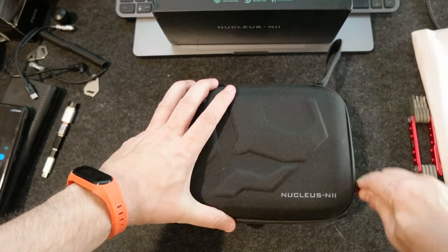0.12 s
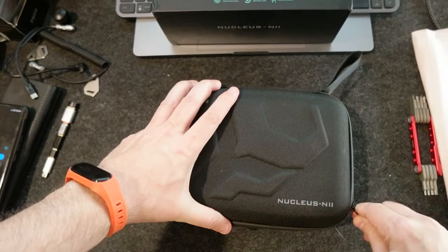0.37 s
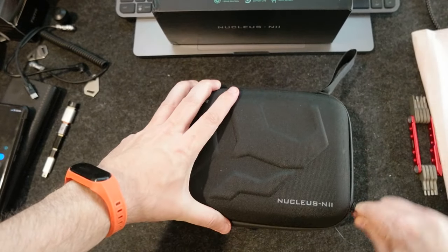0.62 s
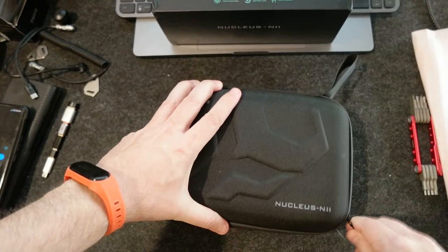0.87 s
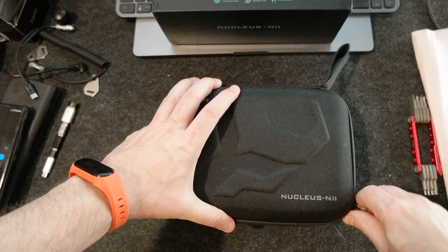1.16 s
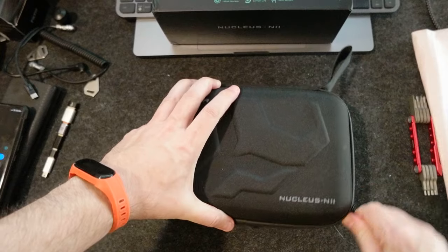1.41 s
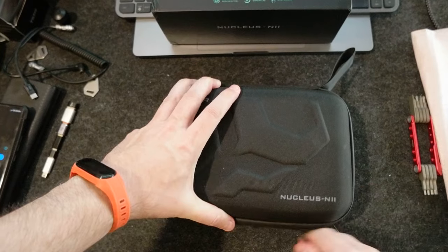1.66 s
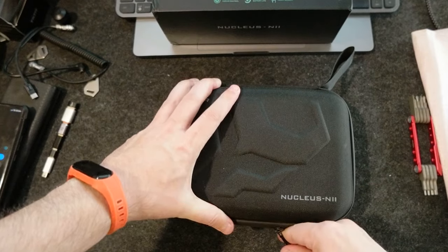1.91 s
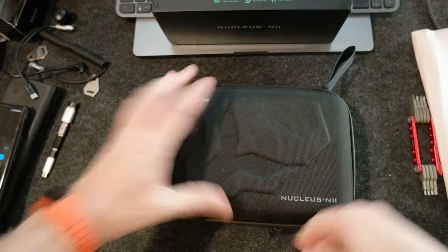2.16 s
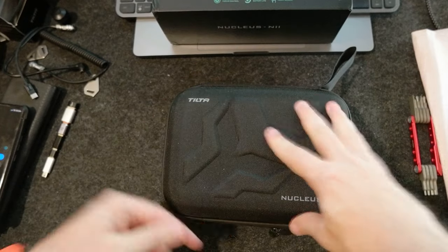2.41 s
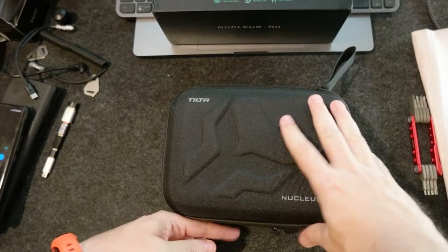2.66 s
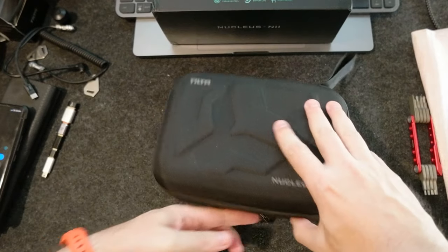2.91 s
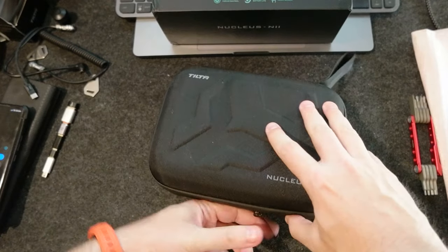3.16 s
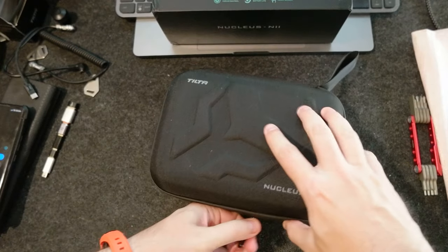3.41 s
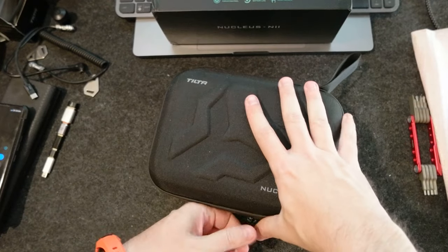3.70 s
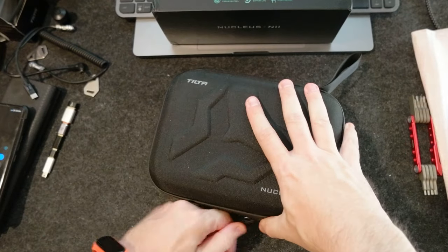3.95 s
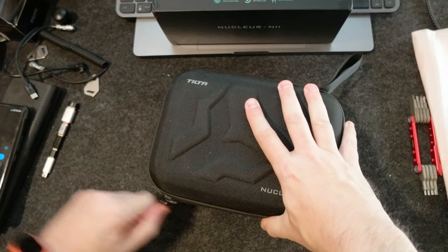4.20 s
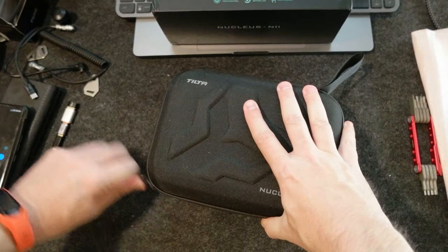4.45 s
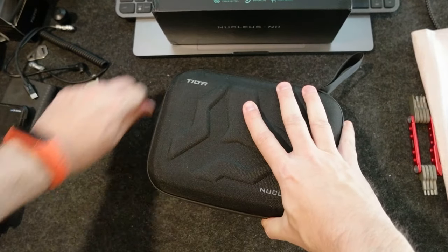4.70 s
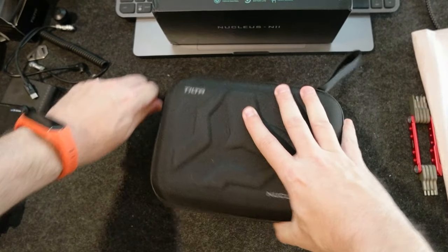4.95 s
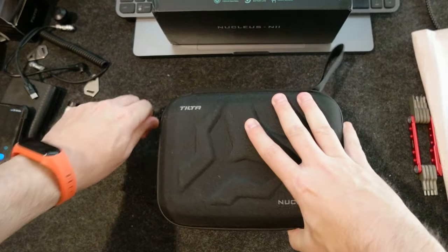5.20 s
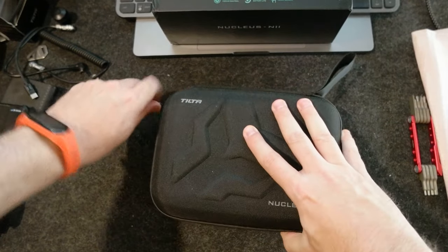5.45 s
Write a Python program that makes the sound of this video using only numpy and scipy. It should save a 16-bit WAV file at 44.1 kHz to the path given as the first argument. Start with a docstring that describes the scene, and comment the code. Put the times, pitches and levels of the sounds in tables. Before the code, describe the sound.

A zipper on a hollow, hard fabric case is heard very close in stereo in a small room with faint air noise and a short tail. From 0 to 1.3 s the slider snags: dry clicks, dull shell knocks and brief scratchy scrapes at about 0.15, 0.3, 0.6, 0.9 and 1.2. At 1.42 a hard click starts a bright, buzzing zip of under 0.2 s; a weaker one follows to 1.8, ending in rapid ticks. Knocks near 1.9 to 2.15 give way to quiet hand rubbing. A faint, higher zip comes at 2.85, then a sharp jerk at 3.12 with a tiny ringing tab. Soft rubs and small taps lead to two stronger rasping pulls, 3.95 to 4.3 and 4.34 to 4.8, the second longer and rougher, with thin metallic clinks near 4.2 and slowing ticks near 4.75. Soft brushing and taps finish, with a clear knock at 5.35.

```python
"""Zipper on a hard fabric case

A zipper is pulled round in short strokes on a felt desk top in a small room, before a close stereo pair.
Teeth buzz as a sine at their passing rate; random slips drive resonant shell and panels, and filtered hiss.
Knocks are noise cracks with struck modes, metal tab and slider are ringing modes; a noise tail is the room.
"""
import sys
import numpy as np
from scipy import signal
from scipy.fft import rfft, irfft
from scipy.io import wavfile
from scipy.ndimage import uniform_filter1d

SR = 44100
rng = np.random.default_rng(int(sys.argv[2]) if len(sys.argv) > 2 else 0)


def makeup_ratio(level_db):
    """Linear amplitude ratio for a level in decibels (20 dB per factor of ten)."""
    decades = np.asarray(level_db, float) / 20
    return 10 ** decades


def persist_wave(psi):
    """Save psi, clipped to +-1, as 16-bit WAV."""
    counts = np.round(np.clip(psi, -1, 1) * 32767).astype(np.int16)
    wavfile.write(sys.argv[1], SR, np.atleast_2d(counts).T)


N = 246519  # length in samples

# Pulls of the slider, one list each. Each row: time in seconds, teeth per second, tooth tone in dB,
# then friction in dB in the shell, on the tape and in the cloth.
PULLS = [
    [(1.417, 281, -50, -49, -44, -55), (1.426, 280, -49.5, -32, -39, -31),
     (1.445, 272, -21, -33, -31, -26.5), (1.47, 271, -22, -17, -29.5, -28.5),
     (1.51, 301, -11, -23.5, -34.5, -36), (1.54, 276, -64, -40, -42, -43), (1.61, 276, -70, -43, -56, -64)],
    [(1.62, 185, -70, -47.5, -48, -54.5), (1.676, 213, -30, -35.5, -37, -42),
     (1.71, 222, -35, -37, -41.5, -43.5), (1.73, 255, -32, -33.5, -38.5, -38),
     (1.78, 289, -47, -36, -47, -50), (1.85, 289, -74.5, -58, -61, -69)],
    [(2.72, 280, -73, -56, -62.5, -59), (2.812, 280, -51, -47, -49, -47),
     (2.854, 285, -49, -37.5, -45, -46.5), (2.884, 355, -32, -40, -42.5, -46.5),
     (2.93, 360, -41.5, -36.5, -43, -47.5), (2.998, 348, -67, -46.5, -49, -53),
     (3.09, 348, -70, -46, -66, -74)],
    [(3.93, 197, -70, -33, -50, -54), (3.973, 197, -58, -30, -37.5, -36.5),
     (4.03, 210, -41.5, -31.5, -35.5, -38.5), (4.066, 270, -28, -25.5, -32.5, -31.5),
     (4.105, 301, -25, -40, -30.5, -30.5), (4.187, 304, -61, -20, -29, -34.5),
     (4.22, 303, -38, -31.5, -36, -43), (4.325, 303, -70, -48, -57, -57)],
    [(4.334, 224, -77.5, -64, -52, -51), (4.342, 224, -62, -32.5, -44.5, -48),
     (4.43, 220, -36, -24.5, -32.5, -34), (4.465, 240, -25.5, -18.5, -29.5, -33.5),
     (4.504, 225, -31, -25.5, -43.5, -50), (4.59, 286, -43, -31, -32, -33),
     (4.652, 331, -22, -24.5, -31.5, -32), (4.68, 309, -34, -31, -32, -29.5),
     (4.712, 280, -48, -28.5, -33.5, -33.5), (4.75, 271, -38, -28, -36, -36),
     (4.84, 271, -79, -44, -54, -57)],
]
# How strongly each pull stirs the panels as the slider moves round the case.
# Each row: rasp in dB, overtones of the teeth in dB.
PULL_PANELS = [(-1.5, -1.5), (0, -5), (3.5, 4.5), (2, 3), (2, 3.5)]
# Second and third harmonic of the teeth driving the panels, in dB relative to tape friction.
OVERTONES_DB = [-44.5, -43]
# Scrapes that a jerk starts and that die away.
# Each row: start in seconds, fade in seconds, then shell, tape and cloth friction in dB.
SCRAPES = [(0.001, 0.12, -49, -37, -47), (.337, 0.07, -36.5, -36.5, -37.5), (0.52, 0.17, -46, -56, -56),
           (0.619, 0.067, -36.5, -39, -39), (0.651, 0.16, -30.5, -37.5, -41),
           (0.883, 0.14, -40, -41.5, -59), (0.917, 0.36, -48, -43, -49.5), (1.056, 0.011, -31, -23, -27.5),
           (1.065, 0.092, -41, -39, -41.5), (1.193, 0.12, -39, -39.5, -46), (1.89, 0.18, -34.5, -50.5, -63),
           (2.16, 0.12, -42, -51, -67), (3.118, 0.14, -30, -36, -33), (3.25, 0.18, -36.5, -40.5, -44.5),
           (3.774, 0.084, -34, -47, -42), (4.855, 0.08, -29.5, -41, -55), (5.154, 0.15, -38.5, -43.5, -53),
           (5.537, 0.037, -45, -66, -80)]
# Hands sliding over the case, swelling and fading.
# Each row: middle in seconds, half length in seconds, then shell, tape and cloth friction in dB.
RUBS = [(0.182, 0.11, -44, -45, -52), (0.283, 0.13, -49, -45, -50), (0.456, 0.022, -47.5, -58, -69),
        (0.513, 0.034, -43, -55, -65), (0.846, 0.046, -60, -46, -55.5), (0.955, 0.064, -64, -37, -47.5),
        (1.324, 0.084, -53.5, -51.5, -72), (1.408, .06, -63, -47, -58), (2.074, 0.29, -54, -55, -50.5),
        (2.142, 0.062, -41.5, -47.5, -66), (2.235, 0.13, -52, -63, -64), (2.327, .1, -48, -61.5, -78),
        (2.412, 0.066, -42, -52, -48.5), (2.539, .1, -52.5, -59, -53), (2.655, 0.16, -59.5, -63, -67),
        (3.115, 0.016, -40, -54, -75), (3.167, 0.15, -42.5, -52, -71), (3.432, 0.1, -52, -48, -50.5),
        (3.621, 0.089, -54, -54.5, -51.5), (3.744, 0.069, -55, -56.5, -50),
        (3.848, 0.13, -49.5, -56.5, -58), (4.919, 0.1, -59, -40, -49), (5.008, 0.13, -37.5, -39.5, -48),
        (5.144, 0.033, -41, -48, -59), (5.325, 0.14, -49.5, -45.5, -52), (5.383, 0.077, -42.5, -49, -58)]
# Snags of the slider and finger knocks. Each row: time in seconds, nominal crack level in dB,
# then shell thump, panel knock and bright snap in dB relative to it, each before its layer's own trim.
KNOCKS = [(0.1, -37.5, -5, 8, -20), (0.136, -18.5, -2.5, -6, -23), (0.177, -15.5, -18, -18, -15.5),
          (0.2766, -22.5, 1, -21, -9), (0.2993, -14.5, -10, -12, -19.5), (0.3348, -13.5, -12.5, -14, -7),
          (0.5177, -40, -7, 25, -5.5), (0.545, -39, -8, 10, -15), (0.58, -39, -8, 6, -15),
          (0.613, -14, -24, -14, -7), (0.6477, -14.5, -34, -9, -7), (0.659, -13, -12, -8, -21),
          (0.8808, -16, -5.5, -8, -28), (0.9192, -18.5, 0.5, -3, -22), (1.054, -15.5, -4, 0, -21),
          (1.1892, -17, -30, 1, -14), (1.2084, -18.5, -9, -13, -18), (1.421, -21, -18, -9, -10),
          (1.431, -6.5, -3, -28, -16), (1.781, -31.5, -5, 12.5, -15), (1.887, -23, 1.5, 0.5, -12),
          (1.929, -17.5, -4, -8, -14.5), (1.958, -21, 3.5, -1, -22), (2.132, -29, -6, -11, -20),
          (2.148, -18.5, -5, -18, -11), (2.285, -35.5, -8, -8, -3), (2.322, -35, -5, -8, -15),
          (2.399, -33, 6, -12, 0), (3.1162, -8.5, -3.5, -8, -3), (3.1552, -27.5, -2, 3.5, -13.5),
          (3.248, -18.5, -3, -1, -2), (3.354, -35, 5, 6, -12), (3.4313, -27, 6, -13, -14),
          (3.708, -32, 3, 0, -18), (3.7719, -22, -1.5, -2, -23), (3.8426, -25.5, -8, -2, -22),
          (3.934, -23, -19.5, -16, -1.5), (3.9574, -12, -20, -10, -26), (3.9654, -18.5, -3, -16, -2.5),
          (3.987, -24, -12, -12, -2), (4.019, -22, -12, -10, -2), (4.24, -11.5, -17, -6, -9),
          (4.338, -14.5, -10, -10, -16), (4.365, -19.5, 8, -2, -4), (4.3819, -14.5, -19, 0, -4),
          (4.5539, -19, 16, -12.5, -27), (4.8528, -33, 8.5, 5.5, -16.5), (5.0402, -23, -2, -2, -12),
          (5.153, -26.5, -7, 6.5, -18), (5.3497, -13.5, -16, -9.5, -13.5), (5.5348, -56, -15, 23, -20.5)]
# Flicks of the pull tab. Each row: start in seconds, shaking level in dB, rattle in seconds.
TAB_FLICKS = [(3.01, -70, .01), (3.12, -41.5, .052), (3.249, -44, .008)]
# Short clinks of the slider body. Each row: time in seconds, frequency in Hz, level in dB.
CLINKS = [(.765, 4570, -39), (0.922, 9600, -25), (2.15, 2000, -28.5), (3.772, 11850, -29),
          (4.188, 6000, -23), (4.192, 6100, -23.5), (4.213, 5930, -25), (4.867, 6160, -40)]
# At a corner the slider slows down in separate ticks. Each row: start in seconds, first gap in seconds,
# growth factor of the gap, frequency in Hz, level in dB, number of ticks.
STUTTER = [(1.705, .0052, 1.19, 3900, -28, 7), (4.737, .0066, 1.28, 7000, -29, 5)]
# Modes of the hollow shell, its stiffer panels, the desk and the pull tab.
# Each row: frequency in Hz, relative level in dB, 60 dB decay time in seconds.
SHELL = [(166.2, -9, 0.06), (232.5, -3, 0.066), (260.7, -5, 0.15), (293.3, -1.5, 0.096), (387.2, 0.5, 0.08),
         (396.7, 0, 0.12), (459.7, 0, 0.039)]
PANELS = [(565, 3.5, 0.017), (640, -1, 0.051), (712, -1, 0.042), (806, -4, 0.048), (910, -1, 0.037),
          (1073, -1.5, 0.026), (1257, -6, 0.024)]
DESK = [(48, 0.5, 0.074), (75.6, -13, 0.035), (113, -4.5, 0.092)]
TAB = [(4094, -1, .055), (4150, -4, .03), (8721, -21, .16), (10415, -6, .22), (10360, -9, .12),
       (10500, -4, .06), (10750, -6, .04)]
# Spectra of the slider on the tape, of cloth and microphone, and of the quiet room air.
# Each row: frequency in Hz, relative density in dB per Hz.
SCRATCH = [(760, -16), (1300, 3), (1830, 3.5), (3310, -2), (3760, -3), (4070, -4.5), (5500, -19.5),
           (7150, -25), (12100, -120)]
HISS = [(2650, -34.5), (4500, 0.5), (5470, -1), (8780, 0), (13100, 3.5), (15900, -5), (16200, -23),
        (16500, -74)]
AIR = [(15, -97), (25, 0), (182, -10.5), (259, -8), (538, -11.5), (746, -7), (1250, -15), (7110, -29),
       (12900, -28.5), (15200, -29.5), (16500, -38)]
# Spectral shape of the side signal. Each row: frequency in Hz, gain in dB before the overall side level.
WIDTH = [(60, -23), (110, -7.5), (200, -16), (380, -18.5), (700, -12), (1290, -9), (2380, -7), (4400, 0.5),
         (8120, 3.5), (15000, 1)]
# As the case opens its voice shifts. Each row: time in seconds, three deepest shell modes in dB,
# panels in dB, left minus right in dB; the first two columns act on friction only.
OPENING = [(0, 5.5, 2, -1.8), (1.5, 5.5, 4, -1.2), (2.6, 8, -4, -1.3), (3.4, -3.5, 0.5, -1.5),
           (4.5, -1.5, -1, -0.5), (5.59, -4, -0.5, -2)]


def rms_one(x):
    """Normalisation to unit mean power."""
    return x / np.sqrt(np.mean(x ** 2) + 1e-20)


def in_time(rows, outside=None):
    """Linear interpolation of each column after the first over the time axis."""
    s, *columns = np.transpose(rows)
    return [np.interp(np.arange(N) / SR, s, c, outside, outside) for c in columns]


def convolve(x, response):
    """Linear filtering: superposed copies of the response."""
    return signal.fftconvolve(x, response)[:N]


def colour(points):
    """Minimum-phase principle: folding the cepstrum gives a causal response of the given spectrum."""
    hz, db = np.transpose(points)
    grid = np.maximum(np.fft.rfftfreq(4096, 1 / SR), 1)
    log_spectrum = np.log(makeup_ratio(np.interp(np.log(grid), np.log(hz), db)))
    cepstrum = irfft(log_spectrum)
    cepstrum[1:2048] *= 2
    cepstrum[2049:] = 0
    return irfft(np.exp(rfft(cepstrum)))


def ring(clicks, hz, t60):
    """Damped oscillator: a unit click starts a decaying sine of initial height 1."""
    decay, w = makeup_ratio(-60 / (t60 * SR)), 2 * np.pi * hz / SR
    # the tiny offset keeps the filter clear of denormal numbers
    return signal.lfilter([0, np.sin(w)], [1, -2 * decay * np.cos(w), decay ** 2], clicks + 1e-18)


def body(clicks, modes):
    """Modal superposition: all modes ring in parallel, with alternating signs."""
    return sum((-1) ** k * makeup_ratio(db) * ring(clicks, hz, t60) for k, (hz, db, t60) in enumerate(modes))


def grains(per_s, spread_db):
    """Stick-slip: fibres and teeth catch and slip at random, a few much harder than the rest."""
    sizes = makeup_ratio(spread_db * np.minimum(rng.exponential(1, N), 5))
    signs = rng.choice([-1, 1], N)
    return sizes * signs * (rng.random(N) < per_s / SR)


def strike(rows, db, modes, scatter_db, contact_hz=20000):
    """Impact excitation: each blow has its own strength per mode; soft contact is a low-pass."""
    at, out = (np.array(rows)[:, 0] * SR).astype(int), np.zeros(N)
    luck = rng.standard_normal((len(at), len(modes)))
    for k, (hz, level_db, t60) in enumerate(modes):
        clicks = np.zeros(N)
        clicks[at] = (-1) ** k * makeup_ratio(db + level_db + scatter_db * luck[:, k])
        out += ring(clicks, hz, t60)
    return signal.lfilter(*signal.butter(2, contact_hz, fs=SR), out)


def teeth(jitter):
    """Periodic excitation: slightly uneven teeth give a pitch; also where they pass and bunch the slips."""
    per_s, tone, push = np.zeros((3, N))
    for rows, (_, overtone_db) in zip(PULLS, PULL_PANELS):
        per_s += in_time(rows, 0)[0]
        _, tone_db, _, tape_db, _ = in_time(rows, -200)  # silent outside the pull
        tone += makeup_ratio(tone_db)
        push += makeup_ratio(tape_db + overtone_db)
    uneven = uniform_filter1d(rng.standard_normal(N), size=300)
    phase = 2 * np.pi * np.cumsum(per_s * (1 + jitter * rms_one(uneven))) / SR
    fundamental = np.sqrt(2) * uniform_filter1d(tone, size=500) * np.sin(phase)
    overtones = makeup_ratio(OVERTONES_DB) @ np.sin([2 * phase, 3 * phase])
    buzz = fundamental + body(push * overtones, PANELS)
    stroking = uniform_filter1d(1. * (per_s > 0), size=3000)
    bunching = 1 + .6 * stroking * np.cos(phase)
    return buzz, stroking, bunching


def friction():
    """Power addition of incoherent sources: pulls, scrapes and rubs set the four friction gains."""
    fade_db = 25  # loss over one fade or half length
    panel_db, panel_share = -2, 0.45  # the panels lie between shell and tape
    t, power, stirred = np.arange(N) / SR, np.full((3, N), 1e-9), np.ones(N)
    for rows, (rasp_db, _) in zip(PULLS, PULL_PANELS):
        power += makeup_ratio(in_time(rows, -200)[2:]) ** 2
        stirred[(t > rows[0][0]) & (t < rows[-1][0])] = makeup_ratio(rasp_db)
    for s, fade_s, *db in SCRAPES:
        dying = (t >= s) * makeup_ratio(-fade_db * np.abs(t - s) / fade_s)
        power += np.outer(makeup_ratio(db), dying) ** 2
    for s, half_s, *db in RUBS:
        swell = makeup_ratio(-fade_db * ((t - s) / half_s) ** 2)
        power += np.outer(makeup_ratio(db), swell) ** 2
    shell, tape, cloth = np.sqrt(power)
    panels = makeup_ratio(panel_db) * stirred * shell ** panel_share * tape ** (1 - panel_share)
    return shell, panels, tape, cloth


def rubbing(gains, stroking, bunching):
    """Common excitation: the same coarse and fine slips drive shell, panels, tape and cloth."""
    shell, panels, tape, cloth = gains
    deep_db, panel_db, _ = in_time(OPENING)
    coarse = grains(1200.0 * bunching, spread_db=3.5)
    fine = grains(6000.0 * bunching, spread_db=2.0)
    # now and then a tooth snags: the slips flare for a millisecond or two
    snags = np.abs(grains(29.0 + 130.0 * stroking, spread_db=5.0))
    flare, flare_s = .35, .0013
    fine = fine * (1 + flare * convolve(snags, np.exp(-np.arange(SR // 100) / SR / flare_s)))
    boom = shell * rms_one(makeup_ratio(deep_db) * body(coarse, SHELL[:3]) - body(coarse, SHELL[3:]))
    rasp = makeup_ratio(panel_db) * panels * rms_one(body(coarse + 0.41 * fine, PANELS))
    scratch = tape * rms_one(convolve(fine + 0.075 * coarse, colour(SCRATCH)))
    hiss = cloth * rms_one(convolve(fine + 0.51 * coarse, colour(HISS)))
    return boom + rasp + scratch + hiss


def knocks():
    """Impact response: a brief noise crack with a scratchy tail, panel knock, shell and desk thump."""
    s, peak_db, thump_db, knock_db, bright_db = np.transpose(KNOCKS)
    t = np.arange(SR // 10) / SR
    rise = 1 - np.exp(-t / .00025)
    shape = rise * (np.exp(-t / 0.0013) + 0.071 * np.exp(-t / 0.023))
    splinters, crack = grains(12000.0, spread_db=6.0), 0
    for db, spectrum in (peak_db - 8.5, SCRATCH), (peak_db + bright_db, HISS):
        clicks = np.zeros(N)
        clicks[(s * SR).astype(int)] = makeup_ratio(db)
        crack = crack + convolve(clicks, shape) * rms_one(convolve(splinters, colour(spectrum)))
    desk = strike(KNOCKS, peak_db + thump_db - 20.5, DESK, scatter_db=2.5, contact_hz=294)
    shell = strike(KNOCKS, peak_db + thump_db - 12.0, SHELL, scatter_db=1.5, contact_hz=650)
    panels = strike(KNOCKS, peak_db + knock_db - 13.0, PANELS, scatter_db=4.5, contact_hz=1470)
    return crack + desk + shell + panels


def metal():
    """Free vibration of metal: the tab rattles on its ring, then rings out; the slider clinks and ticks."""
    t, shaking = np.arange(N) / SR, np.zeros(N)
    for s, db, rattle_s in TAB_FLICKS:
        shaking += makeup_ratio(db) * (t >= s) * (t < s + rattle_s)
    out = body(shaking * grains(2000, spread_db=1.5), TAB)
    for start, gap_s, growth, hz, db, count in STUTTER:
        # the gaps form a geometric series
        ticks = start + gap_s * (growth ** np.arange(count)[:, None] - 1) / (growth - 1)
        ticks = np.r_[ticks, ticks + .0012]  # each tick bounces once
        modes = [(share * hz, 0, .004) for share in (.7, .85, 1, 1.2, 1.45)]
        out += strike(ticks, db, modes, scatter_db=2.5)
    for s, hz, db in CLINKS:
        modes = [(hz, 0, .012), (1.09 * hz, -2, .008), (.9 * hz, -3, .008)]
        out += strike([(s,)], db, modes, scatter_db=1.5)
    return out


def echoes(t60):
    """Diffuse reverberation: dense, exponentially dying noise of unit energy."""
    t = np.arange(int(t60 * SR)) / SR
    tail = rng.standard_normal(len(t)) * makeup_ratio(-60 * t / t60)
    return tail / np.sqrt(np.sum(tail ** 2))


def heard(case):
    """Superposition of direct sound, delayed room tail and the quiet air of the room."""
    tail = convolve(case, np.r_[np.zeros(200), echoes(t60=0.29)])
    air = rms_one(convolve(rng.standard_normal(N), colour(AIR)))
    return case + makeup_ratio(-11.5) * tail + makeup_ratio(-52.5) * air


def scene():
    """Mid-side stereophony: sum and difference of mid and side give left and right."""
    buzz, stroking, bunching = teeth(jitter=0.032)
    gains, tab = friction(), metal()
    mid = heard(rubbing(gains, stroking, bunching) + knocks() + buzz + tab)
    # the case is wide and near: its treble comes from unrelated spots to the left and right
    spots = heard(rubbing(gains, stroking, bunching) + knocks() + .2 * tab)
    side = convolve(spots, colour(WIDTH)) * makeup_ratio(-4)
    balance = makeup_ratio(in_time(OPENING)[2] * [[.5], [-.5]])
    return np.array([mid + side, mid - side]) * balance


def top_cut(x):
    """Nothing passes above the cut-off."""
    return signal.sosfilt(signal.butter(12, 16810, fs=SR, output="sos"), x)


def record(dry):
    """Band limitation: a high-pass cuts the bass and a steep low-pass the top."""
    cut = signal.sosfilt(signal.butter(2, 200, "high", fs=SR, output="sos"), dry)
    # 30 dB down from 16100 Hz upward
    cut = signal.sosfilt(signal.cheby2(12, 30, 16100, fs=SR, output="sos"), cut)
    return top_cut(cut)


dry = scene()
out = record(dry)
persist_wave(out)
```